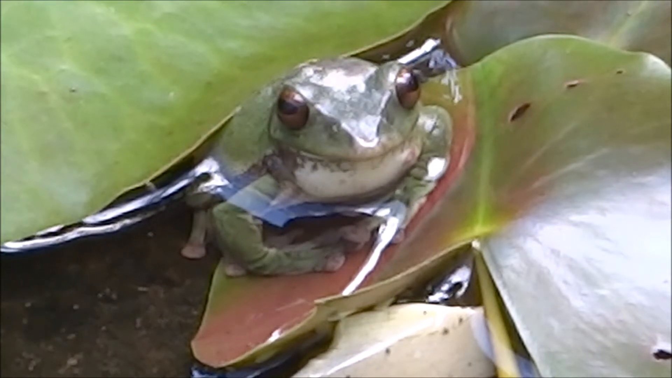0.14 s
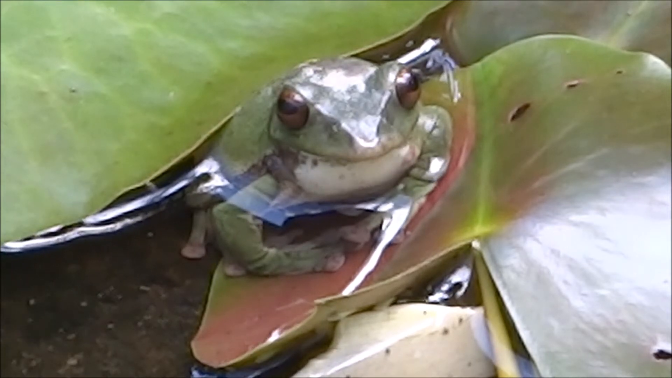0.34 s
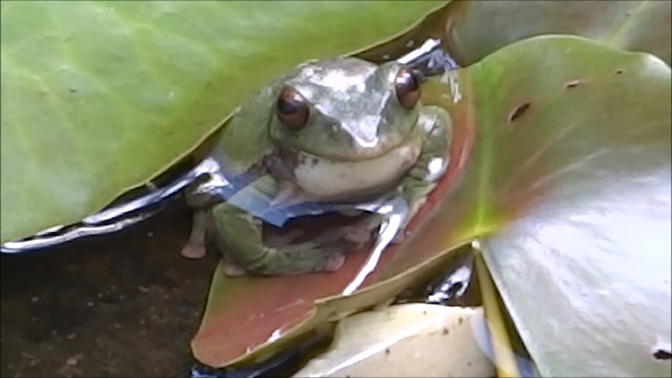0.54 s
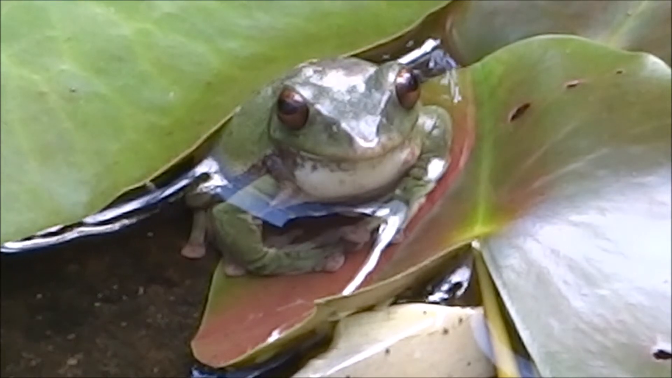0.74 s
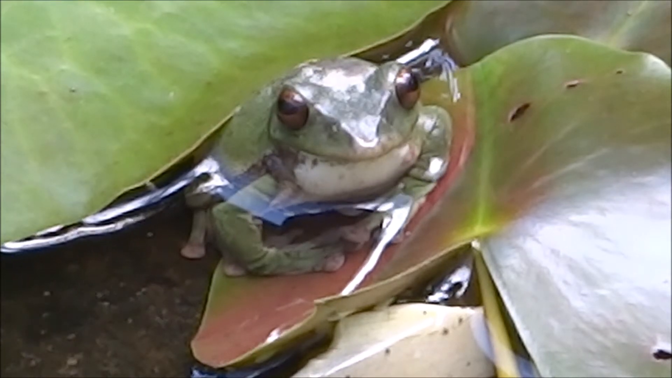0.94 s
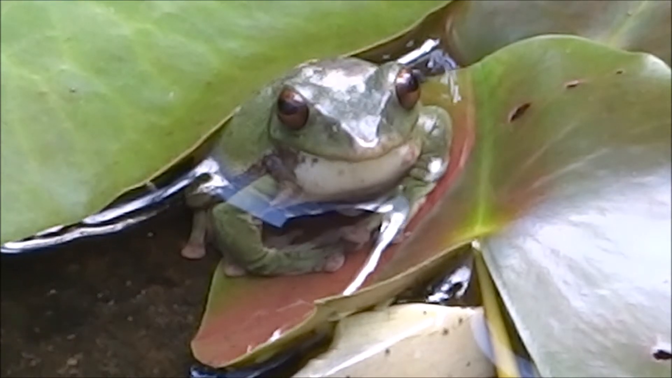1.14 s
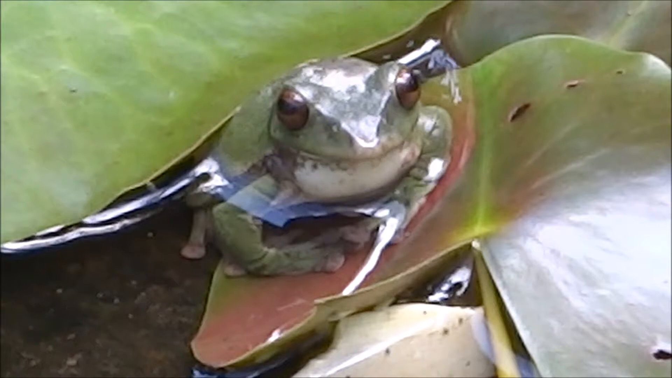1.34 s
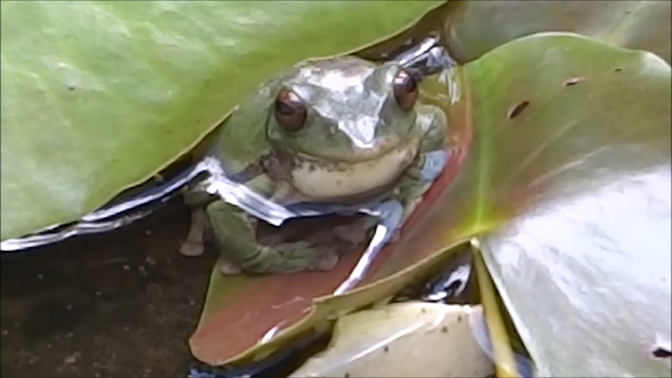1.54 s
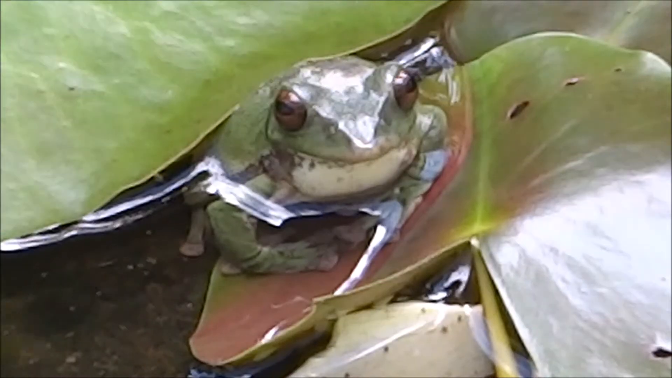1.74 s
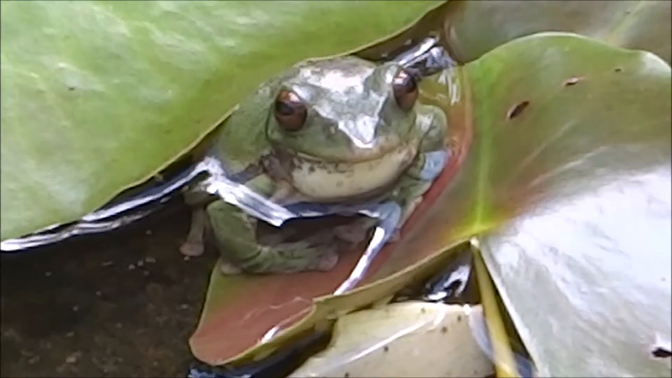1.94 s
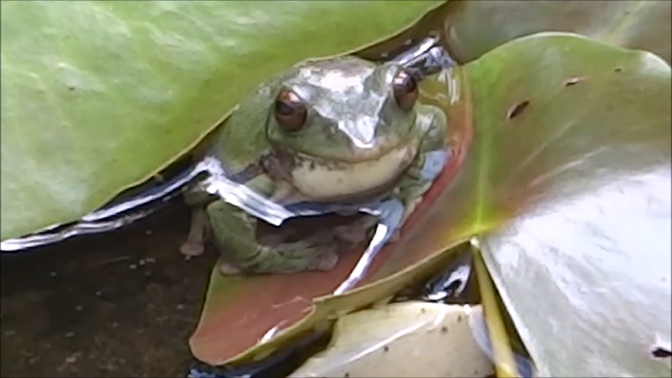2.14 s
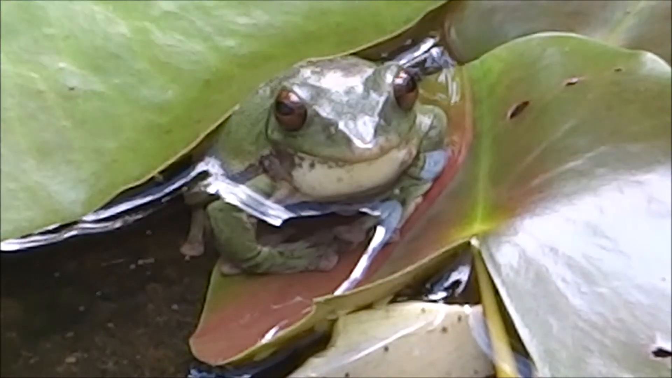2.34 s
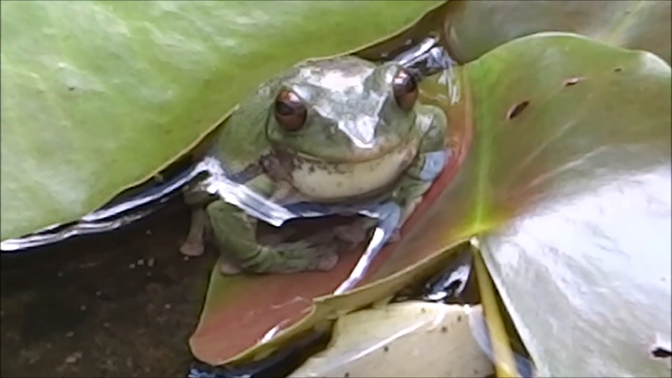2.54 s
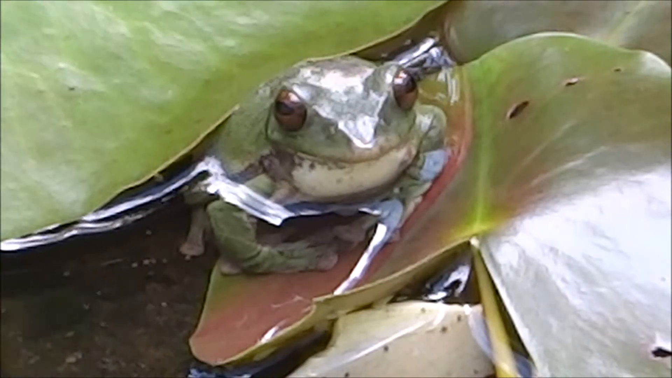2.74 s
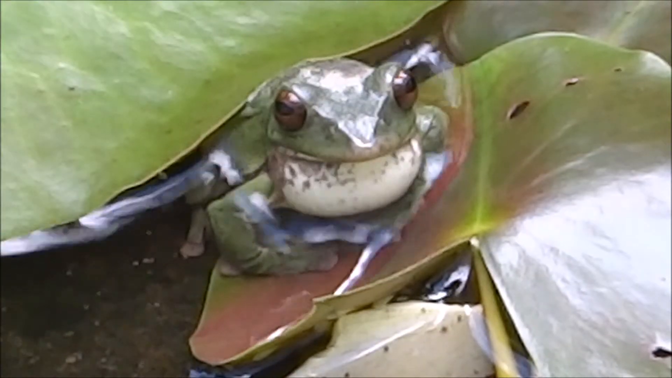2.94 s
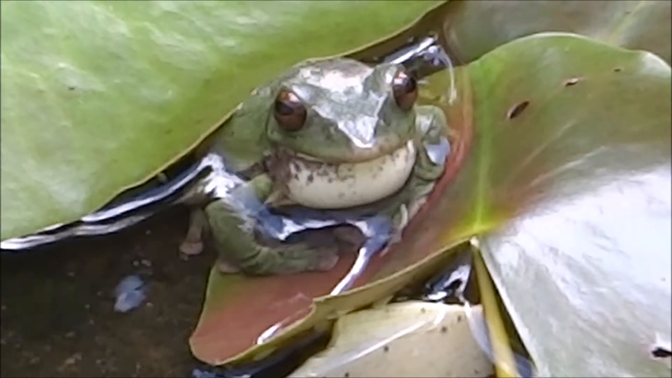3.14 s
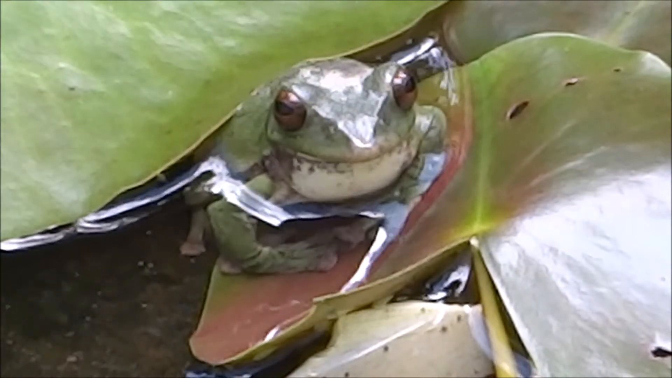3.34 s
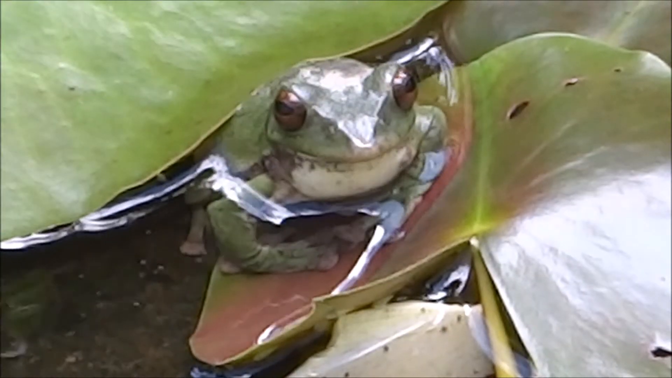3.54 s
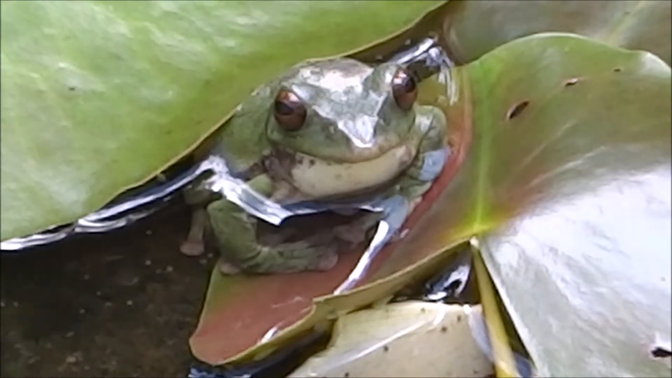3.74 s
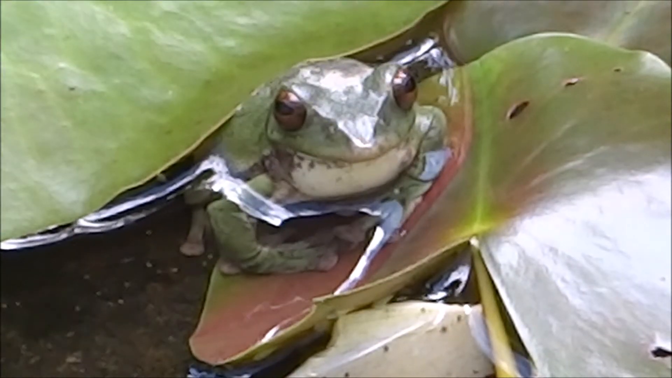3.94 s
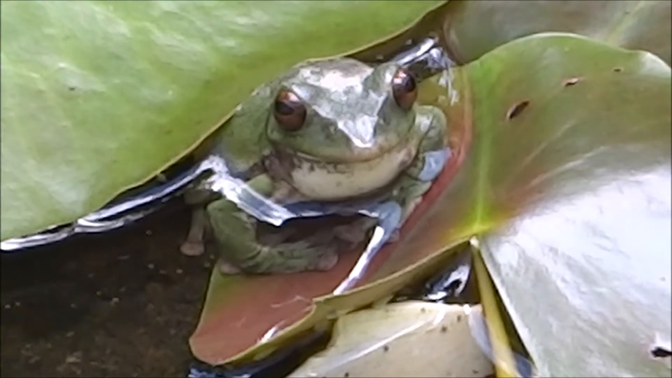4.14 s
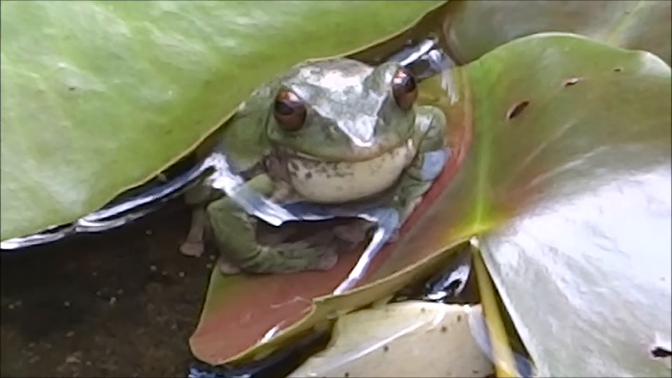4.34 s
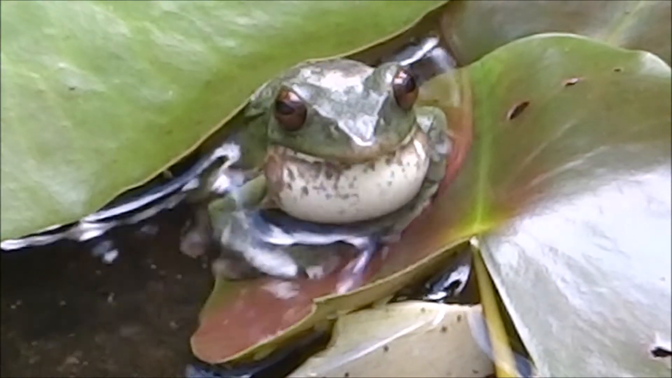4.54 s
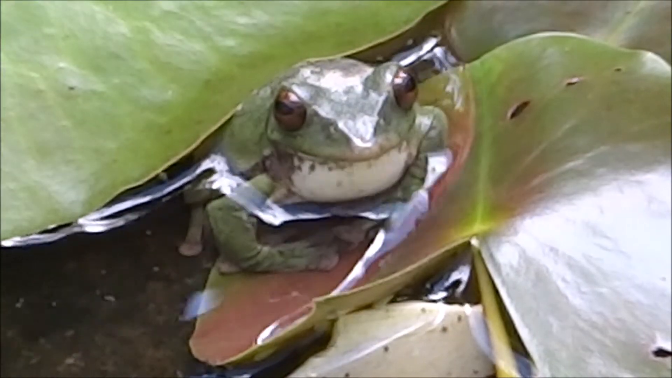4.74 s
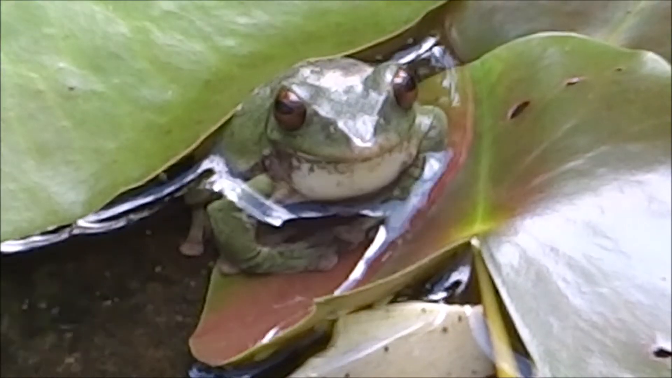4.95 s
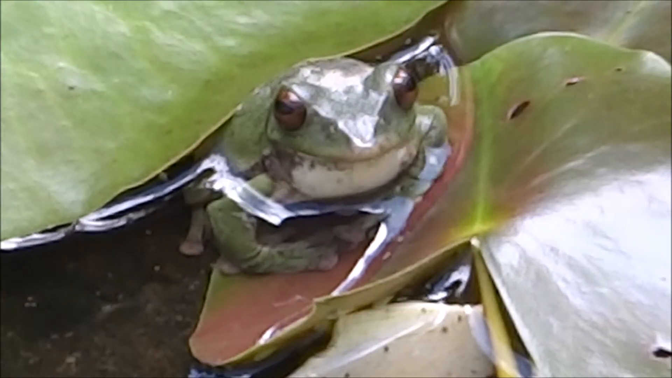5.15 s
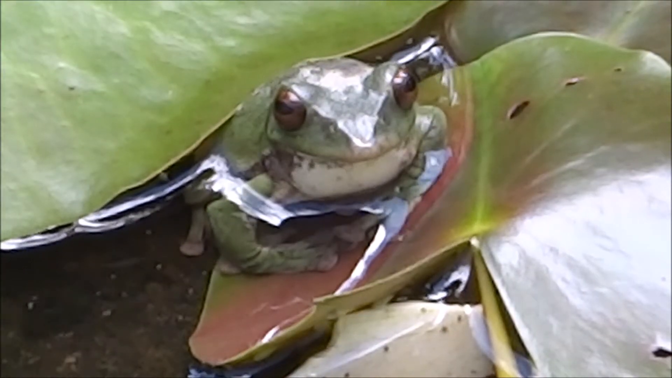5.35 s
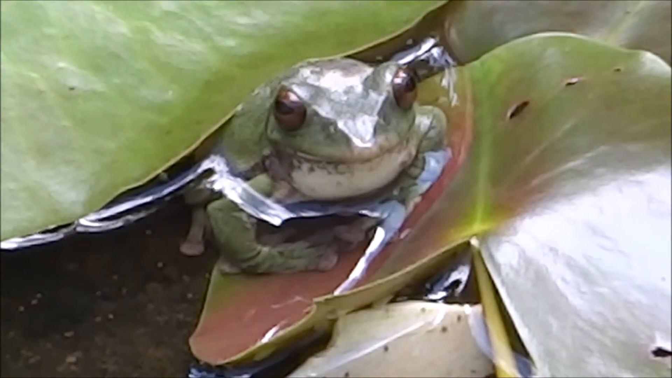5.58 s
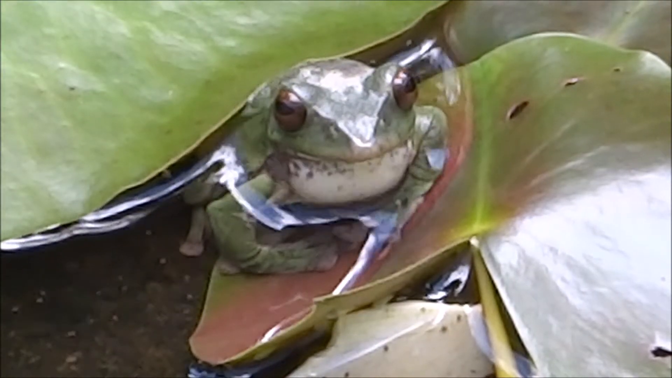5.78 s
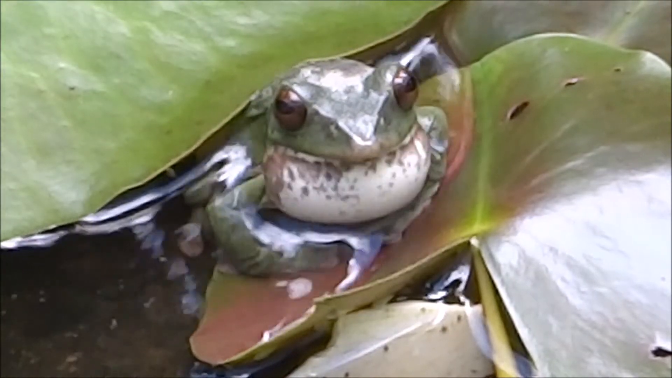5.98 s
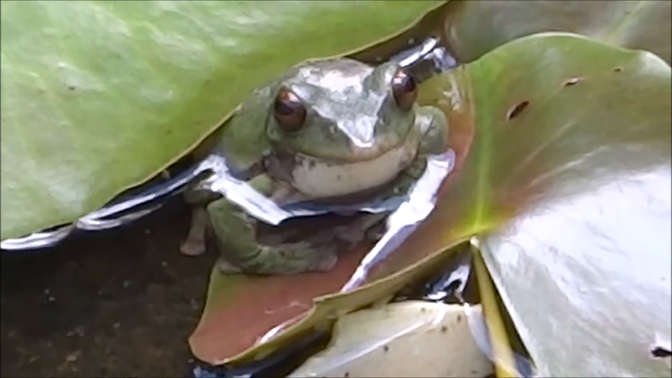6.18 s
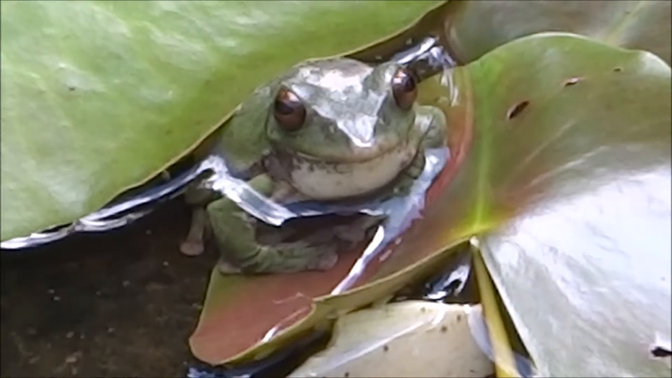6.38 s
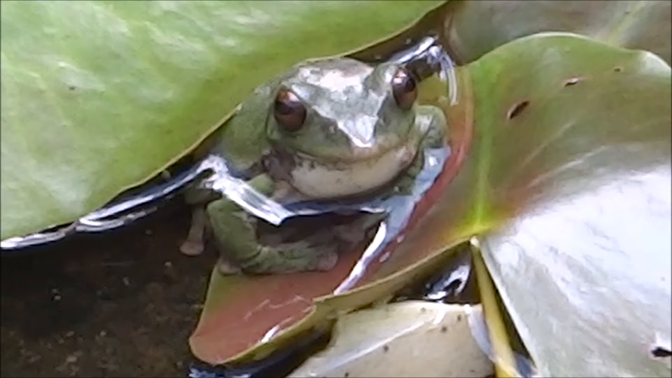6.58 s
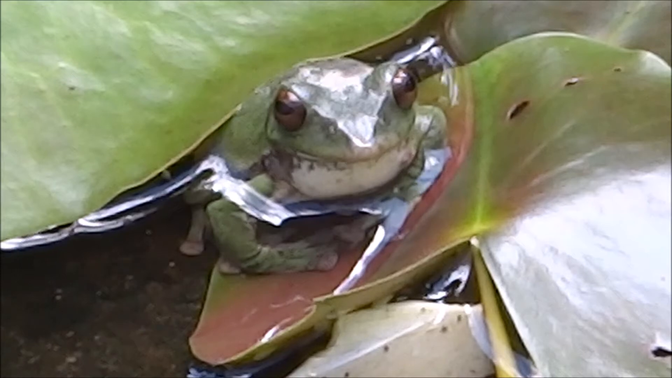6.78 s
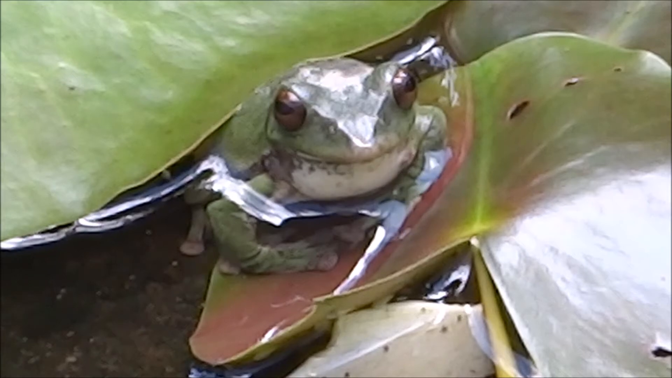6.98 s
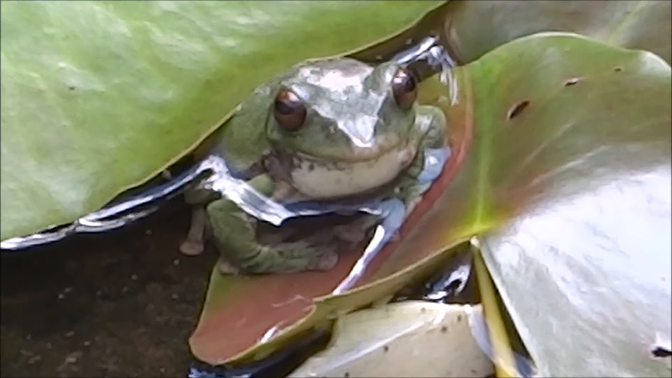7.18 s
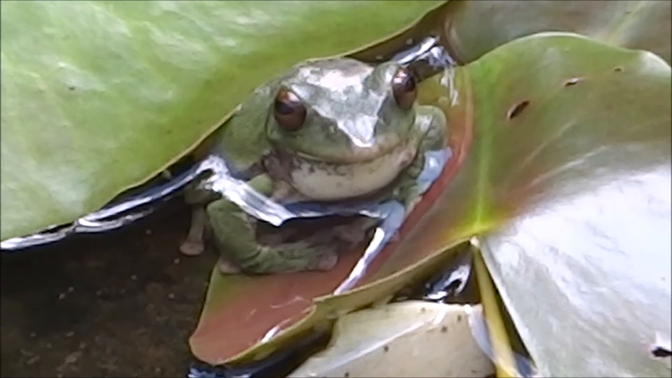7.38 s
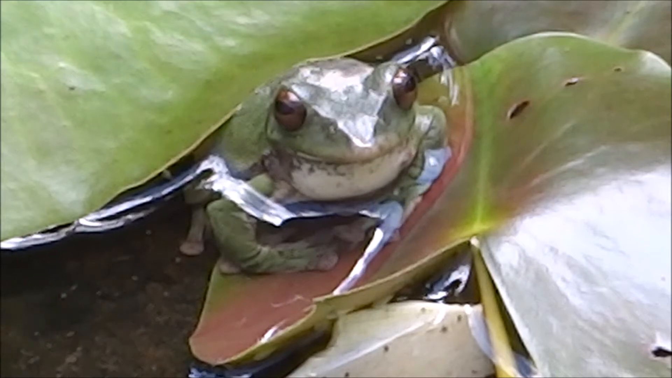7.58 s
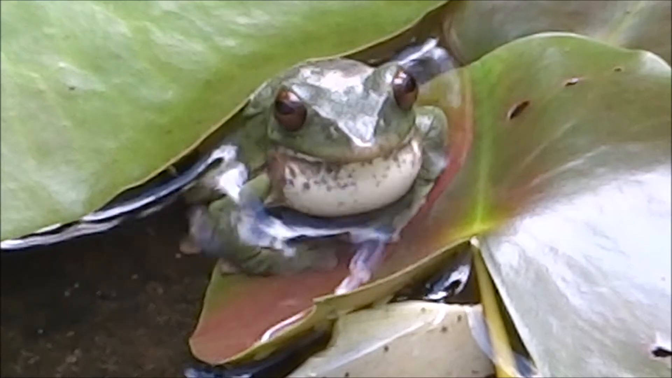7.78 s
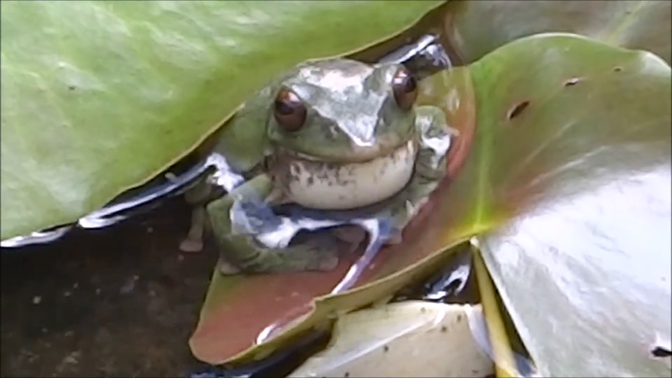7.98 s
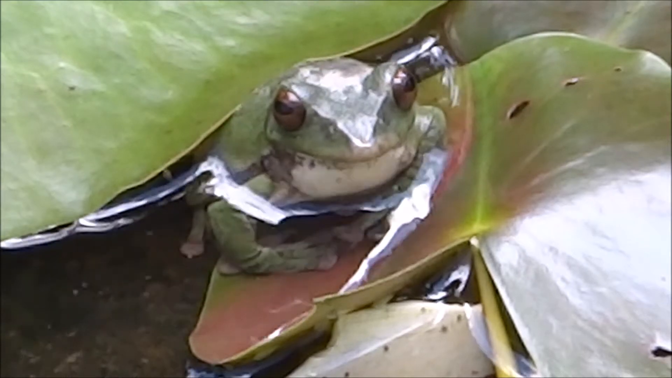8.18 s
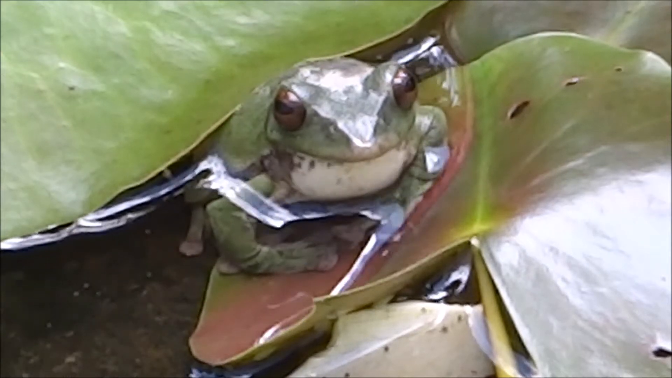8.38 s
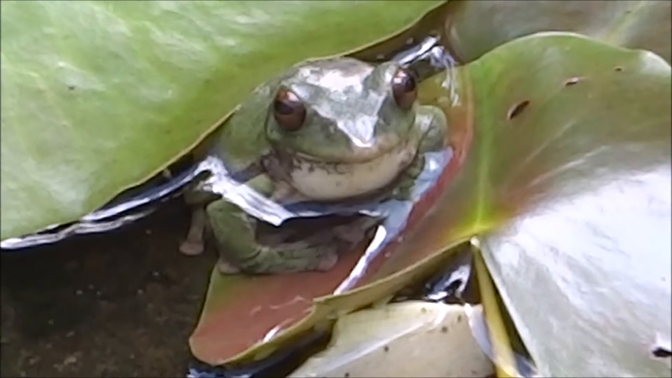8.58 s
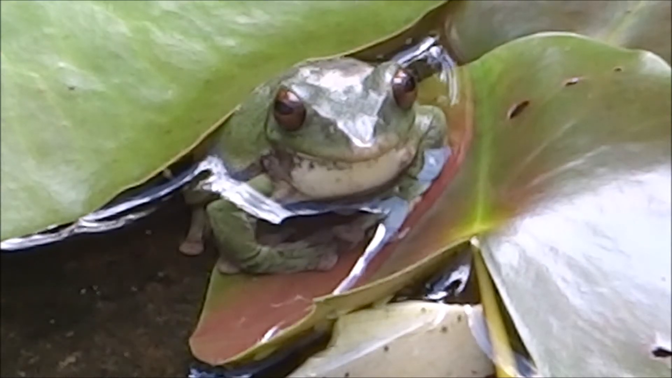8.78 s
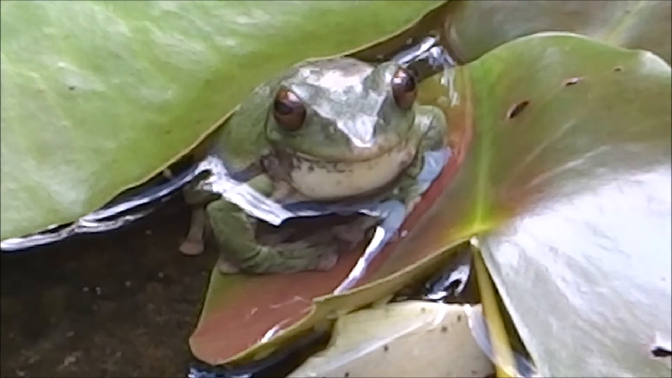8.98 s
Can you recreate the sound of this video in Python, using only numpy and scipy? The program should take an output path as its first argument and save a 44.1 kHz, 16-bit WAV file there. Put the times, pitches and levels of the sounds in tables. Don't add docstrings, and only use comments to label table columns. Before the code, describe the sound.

A garden pond outdoors, heard in stereo from an arm's length. Soft distant traffic hum and fine hiss lie under thin, high songbird chirps, slightly blurred by trees. From about 0.7 to 1.5 s a gust thumps and flutters low on the microphone, strongest near 1.0; at 1.5 s the ambience cuts abruptly to calmer air. Faint chirps continue. At 3.0 s a tree frog snaps out two loud, dry, hollow croaks, about 50 ms apart, with a short garden echo. Bird whistles slide downward from 3.3 to 4.0, with tiny far peeps. Three croaks come at 4.5, four at 5.9, with a small bright water spatter at 6.1. A low wavering whistle follows, ending in a quick tumbling flourish near 7.0. High birdsong repeats throughout. The last, loudest four croaks come at 7.8; the background dips slightly, then recovers, with a faint chirp at 8.6.

```python
import sys
import numpy as np
from scipy import signal
from scipy.fft import rfft, irfft, next_fast_len
from scipy.io import wavfile
from scipy.ndimage import uniform_filter1d

SR = 44100
rng = np.random.default_rng(int(sys.argv[2]) if len(sys.argv) > 2 else 0)


def how_loud(loudness_db):
    steps = np.asarray(loudness_db, float) / 20
    return 10 ** steps


def bounce(signal):
    frames = np.transpose(np.atleast_2d(signal))
    limited = np.clip(frames, -1, 1)
    pcm = np.round(limited * 32767).astype(np.int16)
    wavfile.write(sys.argv[1], SR, pcm)


N = 397782
T = np.arange(N) / SR
CHANGE_S = 1.516


def add(out, x, s, pan_db):
    i = int(round(s * SR))
    x = (x * how_loud(np.array([[pan_db], [-pan_db]]) / 2))[:, max(-i, 0):N - i]
    out[:, max(i, 0):max(i, 0) + x.shape[1]] += x


def butter(x, order, hz, kind="low"):
    return signal.sosfilt(signal.butter(order, hz, kind, fs=SR, output="sos"), x)


def walk(rate):
    k = int(SR / rate)
    w = uniform_filter1d(np.repeat(rng.standard_normal(N // k + 1), k)[:N], k)
    return w / w.std()


def tail(t60_s, db, onset_s, clump_db, top_hz):
    t = T[:int(.7 * SR)]
    noise = rng.standard_normal((3, len(t)))
    ears = butter(noise[0] + 0.42 * noise[1:], 1, top_hz)
    decay_db = -60 * t / t60_s
    ears = ears * how_loud(clump_db * walk(300)[:len(t)] + decay_db) * (1 - np.exp(-t / onset_s))
    return ears * how_loud(db) / np.sqrt(np.mean(np.sum(ears ** 2, axis=1)))


def echo(x, response):
    return signal.fftconvolve(x, response, axes=1)[:, :N]


def tone(rows, flutter_db):
    attack_s, release_s, edge_db = .005, .005, -18
    s, hz, db = np.transpose(rows)
    t = np.arange(s[0], s[-1], 1 / SR)
    knots = np.arange(s[0], s[-1], .006)
    flutter = np.interp(t, knots, rng.standard_normal(len(knots)))
    fade_in = np.clip(1 - (t - s[0]) / attack_s, 0, 1)
    fade_out = np.clip(1 - (s[-1] - t) / release_s, 0, 1)
    level_db = np.interp(t, s, db) + edge_db * (fade_in + fade_out) + flutter_db * flutter
    phase = 2 * np.pi * np.cumsum(np.interp(t, s, hz)) / SR
    return np.sqrt(2) * how_loud(level_db) * np.sin(phase)


# (frequency [Hz], spectral density [dB per Hz])
HUM_SPECTRUM = [(15, -68), (60, -35), (480, -4.5), (950, -2.5), (3500, -10), (5090, -12.5), (11700, -16.5),
                (15800, -20.5)]
# (frequency [Hz], left-right correlation [-1 to 1])
EAR_LIKENESS = [(60, 0.2), (130, 0.24), (290, -0.05), (640, -0.12), (1410, -0.14), (3100, 0.08),
                (6820, 0.48), (15000, 0.76)]
HUM_TRIM_DB, HISS_TRIM_DB, HUM_PAN_DB = -0.5, 1, -1
TRAFFIC_DB, TRAFFIC_AFTER_DB, TRAFFIC_FADE_DB_S = -60, -58, -0.0266
HISS_DB, HISS_AFTER_DB, HISS_FADE_DB_S = -68.5, -69.5, 0.0445
DUCK_S, DUCK_DB, RECOVER_S = 7.95, -2.5, 0.69


def town():
    size = next_fast_len(N)
    hz = np.maximum(np.fft.rfftfreq(size, 1 / SR), 1)
    like_hz, like = np.transpose(EAR_LIKENESS)
    like = np.clip(np.interp(np.log(hz), np.log(like_hz), like), -.9, .95)
    mid, side = rfft(rng.standard_normal((2, size)))
    ears = mid * np.sqrt(1 + like) + side * np.sqrt(1 - like) * np.array([[1], [-1]])
    hum_hz, hum_db = np.transpose(HUM_SPECTRUM)
    ears = ears * how_loud(np.interp(np.log(hz), np.log(hum_hz), hum_db))

    since = T - CHANGE_S
    traffic_db = np.where(since < 0, TRAFFIC_DB, TRAFFIC_AFTER_DB + TRAFFIC_FADE_DB_S * since)
    hiss_db = np.where(since < 0, HISS_DB, HISS_AFTER_DB + HISS_FADE_DB_S * since) + 0.45 * walk(6)
    power = np.abs(ears[0] + ears[1]) ** 2 / (2 * size ** 2)
    low_db = -10 * np.log10(power[(hz > 400) & (hz < 1500)].sum())
    high_db = -10 * np.log10(power[(hz > 8000) & (hz < 15000)].sum())
    duck_db = DUCK_DB * np.exp(-np.abs(T - DUCK_S) / RECOVER_S) * (T > DUCK_S)

    out = 0
    for centre in 2. ** np.arange(4, 15):
        hiss_share = np.clip((np.log2(centre) - 10) / 3, 0, 1)
        band = np.cos(np.pi / 2 * np.clip(np.log2(hz / centre), -1, 1)) ** 2
        db = (1 - hiss_share) * (traffic_db + low_db + HUM_TRIM_DB + 1.53 * walk(3.02))
        db = db + hiss_share * (hiss_db + high_db + HISS_TRIM_DB) + duck_db
        pan = (1 - hiss_share) * HUM_PAN_DB * np.array([[.5], [-.5]])
        out = out + irfft(ears * band, size)[:, :N] * how_loud(db + pan)
    return out


# (frequency [Hz], level [dB])
WHINE_TONES = [(11569, -85), (11628, -85)]


def whine():
    return sum(np.sqrt(2) * how_loud(db) * np.sin(2 * np.pi * f * T) for f, db in WHINE_TONES)


def song(syllables, ratio, bend, swell_db):
    tremor = .008
    out, u = np.zeros((2, SR // 4)), np.linspace(0, 1, num=16)
    for s, length, from_hz, to_hz, db in syllables:
        wobble = 1 + tremor * rng.standard_normal(len(u))
        hz = ratio * wobble * (from_hz + (to_hz - from_hz) * u ** bend)
        rows = np.c_[length * u, hz, db + swell_db * (u - .5)]
        add(out, tone(rows, flutter_db=4.0), s, 0)
    return out[0]


# (time after start [s], length [s], start frequency [Hz], end frequency [Hz], level [dB])
ARCH_SYLLABLES = [
    (0, .054, 5850, 6950, 3),
    (.05, .018, 6880, 6200, -6),
    (.066, .029, 6150, 6900, 0),
]
SCOOP_SYLLABLES = [
    (0, .008, 3900, 3480, -14),
    (0, .069, 3450, 4150, -1),
    (.068, .041, 3450, 4200, -2),
    (.125, .043, 3650, 4200, -11),
]
TICK_SYLLABLES = [
    (.001, 0.018, 4860, 5340, 6.5),
    (.058, .018, 5000, 5550, -6),
]
CLIMB_SYLLABLES = [
    (0, .07, 3950, 5650, 3),
    (.062, .06, 5600, 5650, -11),
]
# (time [s], level [dB], pitch ratio [1])
ARCH_TIMES = [(-.035, -58, 0.99), (0.17, -61.5, 1.01), (.628, -62, .98), (.82, -62, 0.98),
              (1.287, -59.5, .99), (1.492, -60.5, 1.03), (4.165, -66.5, 1.01), (4.364, -66, .99),
              (4.807, -61.5, 1.01), (5.006, -59, 1.02), (5.47, -59, 1.001), (5.66, -55.5, .98),
              (6.114, -54.5, .99), (6.315, -54.5, 0.98), (6.791, -65, 1.001), (6.99, -64.5, 1.02),
              (7.508, -60.5, .97), (7.732, -62.5, .98)]
SCOOP_TIMES = [(0.399, -53.5, 1.007), (1.053, -52.5, .99), (4.586, -52.5, 1.03), (5.23, -53, 1.024),
               (5.889, -56.5, 0.98), (6.546, -49.5, 1.01), (7.225, -49, 1.03), (7.982, -51.5, 1.004)]
CLIMB_TIMES = [(0.26, -61, 1.02), (.72, -65, 1.01), (1.185, -62, .99), (2.32, -70, 1.06),
               (2.77, -64, 1.001), (3.235, -62, 1.02), (3.705, -63.5, 1.01), (4.201, -72, 1.01),
               (5.611, -67.5, .92), (8.635, -64, .96)]
# (bend [under 1 starts fast, over 1 ends fast], swell over a syllable [dB], direct sound [dB])
ARCH_MANNER, SCOOP_MANNER = (.42, -4, -3.5), (2.4, 5, 1.5)
TICK_MANNER, CLIMB_MANNER = (.8, -4, 1.5), (1.05, 1, -8)
TICK_LEAD_S, TICK_DB = .03, -16.5
SONG_PAN_DB = 1


def songbirds(trees):
    before, after = np.zeros((2, 2, N))
    tick_times = np.add(SCOOP_TIMES, (-TICK_LEAD_S, TICK_DB, 0))
    songs = ((ARCH_SYLLABLES, ARCH_MANNER, ARCH_TIMES), (SCOOP_SYLLABLES, SCOOP_MANNER, SCOOP_TIMES),
             (TICK_SYLLABLES, TICK_MANNER, tick_times), (CLIMB_SYLLABLES, CLIMB_MANNER, CLIMB_TIMES))
    for syllables, (bend, swell_db, direct_db), times in songs:
        for s, db, ratio in times:
            note = how_loud(db) * song(syllables, ratio, bend, swell_db)
            heard = signal.fftconvolve(note[None], trees, axes=1)
            add(heard, how_loud(direct_db) * note, 0, 0)
            add(before if s < CHANGE_S else after, heard, s, SONG_PAN_DB)
    return before * (T < CHANGE_S) + after


# (time [s], peak level [dB], frequency [Hz])
WIND_PUFFS = [(0.459, -66, 334), (0.549, -67, 318), (0.684, -58, 131.6), (0.767, -47, 132),
              (0.789, -41.5, 184), (0.822, -49, 132), (0.874, -39, 263), (0.91, -49, 218),
              (0.939, -59, 165), (0.978, -41, 132), (0.989, -47, 132), (0.997, -29.5, 288),
              (1.014, -37, 190), (1.023, -37, 273), (1.04, -31, 248), (1.046, -37, 132), (1.084, -53, 315),
              (1.149, -67, 132), (1.204, -57, 132), (1.234, -50, 135), (1.259, -53, 334), (1.289, -60, 191),
              (1.323, -54, 150), (1.389, -60, 350), (1.453, -53, 176), (1.496, -50, 168)]


def wind_slaps():
    length_cycles, shift_rad = .52, 1.1
    out = np.zeros((2, N))
    for (s, db, hz), (turn, skew) in zip(WIND_PUFFS, rng.uniform(-0.55, 1, (len(WIND_PUFFS), 2))):
        cycles = np.arange(-3 * SR / hz, 3 * SR / hz) * hz / SR
        apart = (1.08 + 0.28 * skew) * hz / 200 * np.array([[-.5], [.5]])
        phase = 2 * np.pi * cycles + np.pi * turn + shift_rad * apart
        envelope = np.exp(-((cycles + 0.096 * apart) / length_cycles) ** 2)
        add(out, how_loud(db + 4.0) * envelope * np.cos(phase), s - 3 / hz, 0)
    return out


def wind_rumble():
    rumble_db, slope, swell_s, calm_db = -26.5, 0.66, 0.015, -86
    noise = rng.standard_normal((3, N))
    rumble = butter(noise[0] + .5 * noise[1:], 2, (45, 150), "band")
    swell = how_loud(calm_db)
    for s, db, hz in WIND_PUFFS:
        swell = swell + how_loud(slope * db + rumble_db) * np.exp(-np.abs(T - s) / swell_s)
    return rumble / rumble.std() * swell * how_loud(2.6 * walk(40)) * (T < CHANGE_S)


# (time [s], peak level [dB], sac resonance [Hz], mouth resonance [Hz], overtone boost [dB])
CROAK_CALLS = [(3.005, -13, 874, 2810, 0), (3.058, -15, 796, 3160, 1), (4.494, -14, 876, 3030, 4.5),
               (4.537, -10.5, 1024, 3420, 3.5), (4.586, -9.5, 1020, 3460, 5), (5.859, -14.5, 923, 3090, 3),
               (5.904, -11, 1073, 3520, 3), (5.952, -9.5, 1102, 3590, 1), (6.009, -11, 1020, 3410, 7),
               (7.785, -16, 904, 2870, 3), (7.825, -11, 1134, 3510, 4), (7.875, -9.5, 1170, 3600, 1),
               (7.928, -9, 1170, 3600, 1.5)]
LARYNX_SLIPS = [
    (3.0096, -19.5, 1330, 2880, 12),
    (3.062, -20, 1300, 2600, 8),
    (4.4993, -24, 970, 3300, 3),
    (2.83, -40, 900, 2700, -3),
]
# (multiple of mouth resonance [1], level [dB], decay [ms])
MOUTH_OVERTONES = [(.51, -14, 3.1), (0.7, -21, 3.1), (.86, -23, 2.1), (1.35, -38, 7.2), (1.6, -38.5, 3),
                   (2.8, -39, 1.3)]
SAC_DECAY_MS, MOUTH_DECAY_MS, THROAT_DECAY_MS = 9.2, 2.76, 4.0
MOUTH_DB, FRESH_DB, FRESH_S = -15, 2, 0.21
THROAT_HZ, THROAT_DB = 1345, -17
SLACK = 0.45
RASP_DB, RASP_DECAY_MS, RASP_HZ = -26.5, 2.74, 1800
SAG = 0.0094
RISE_MS, LEAD_MS = .22, 1.75
FULL_DB, OPEN_MS, OPEN_MS_PER_DB, SHUT_MS = -8.5, 5.84, 0.34, 0.79
FROG_PAN_DB = -0.8


def frog_croaks():
    out, ms = np.zeros((2, N)), 1000 * T[:600]
    calls = list(CROAK_CALLS) + LARYNX_SLIPS
    chance = rng.standard_normal((len(calls), 2, len(MOUTH_OVERTONES)))
    air = butter(rng.standard_normal((len(calls), len(ms))), 1, RASP_HZ)
    clock = 2 * np.pi * ms * (1 - SAG * (ms - 2.5)) / 1000
    for (s, db, sac_hz, mouth_hz, boost_db), (detune, spread), hiss in zip(calls, chance, air):
        burst_s = min(c[0] for c in calls if c[0] > s - .3)
        mouth_db = MOUTH_DB + FRESH_DB * np.exp(-((s - burst_s) / FRESH_S) ** 2)
        throat_db = THROAT_DB - SLACK * (db - FULL_DB)
        modes = [(sac_hz, 0, SAC_DECAY_MS), (mouth_hz, mouth_db, MOUTH_DECAY_MS),
                 (THROAT_HZ, throat_db, THROAT_DECAY_MS)]
        for (ratio, d, decay_ms), a, b in zip(MOUTH_OVERTONES, detune, spread):
            modes.append((mouth_hz * ratio * (1 + 0.018 * a), d + boost_db + 2.9 * b, decay_ms))
        ring = sum(how_loud(d) * np.exp(-ms / decay_ms) * np.sin(f * clock) for f, d, decay_ms in modes)
        rasp = how_loud(RASP_DB) * np.exp(-ms / RASP_DECAY_MS) * hiss / hiss.std()
        open_ms = OPEN_MS + OPEN_MS_PER_DB * (db - FULL_DB)
        opening = 1 / (1 + np.exp((LEAD_MS - ms) / RISE_MS))
        closing = 1 / (1 + np.exp((ms - open_ms) / SHUT_MS))
        add(out, (ring + rasp) * opening * closing * how_loud(db + 6.0), s - LEAD_MS / 1000, FROG_PAN_DB)
    return signal.sosfilt(signal.cheby2(4, 28, 460, "high", fs=SR, output="sos"), out)


# (delay [ms], level [dB], left minus right [dB])
GARDEN_ECHOES = [(4.773, -16, -2.5), (7.32, -24, -1), (10.74, -21, 3), (19.8, -26, 1.5), (33.8, -21, -4),
                 (53, -22.5, 4)]


def garden(croaks):
    response = tail(t60_s=.32, db=-16, onset_s=0.0067, clump_db=-1.0, top_hz=2520)
    ms = 1000 * T[:400]
    roughness = rng.standard_normal((len(GARDEN_ECHOES), len(ms)))
    for (delay_ms, db, pan_db), facets in zip(GARDEN_ECHOES, roughness):
        smear = uniform_filter1d(facets, size=4) * np.exp(-ms / (.11 * delay_ms))
        smear[:4] += 0.63 * np.abs(smear).max()
        add(response, how_loud(db) * smear / np.linalg.norm(smear), delay_ms / 1000, pan_db)
    return echo(croaks, butter(response, 1, 1800, "high"))


def through_trees(out, phrase, trees, wet_db):
    note = tone(phrase, flutter_db=2.8)
    heard = how_loud(wet_db) * signal.fftconvolve(note[None], trees, axes=1)
    add(heard, note, 0, -3.5)
    add(out, heard, phrase[0][0], 0)


# (time [s], frequency [Hz], level [dB])
WHISTLE_PHRASES = [
    [(2.96, 3000, -68), (3.02, 3100, -51.5), (3.074, 3126, -52.5), (3.13, 3180, -67), (3.24, 3150, -73)],
    [(3.29, 2620, -64), (3.33, 2704, -54.5), (3.41, 2417, -60), (3.46, 2390, -61), (3.52, 2370, -63.5),
     (3.62, 2380, -76)],
    [(3.73, 3680, -62), (3.8, 3450, -61), (3.888, 2665, -62), (3.97, 2700, -60.5), (4.04, 2770, -71)],
    [(6.14, 1844, -65), (6.22, 1865, -67), (6.36, 1870, -53), (6.456, 1860, -57.5), (6.562, 1870, -47),
     (6.69, 1850, -60)],
]
# (time [s], frequency [Hz], level [dB])
FLOURISH_PHRASES = [
    [(6.697, 1960, -42), (6.71, 2100, -56), (6.73, 1940, -54), (6.778, 1474, -62)],
    [(6.805, 1890, -62), (6.832, 1963, -48), (6.846, 2720, -49), (6.856, 3080, -52), (6.866, 2800, -65)],
    [(6.936, 3980, -56), (6.944, 3820, -44), (6.955, 4356, -57), (6.972, 2997, -46.5), (6.99, 2350, -50),
     (7.04, 2150, -58), (7.08, 1943, -53.5), (7.118, 1414, -59)],
]


def whistler(trees):
    out = np.zeros((2, N))
    for phrases, wet_db in ((WHISTLE_PHRASES, -5), (FLOURISH_PHRASES, 5.0)):
        for phrase in phrases:
            through_trees(out, phrase, trees, wet_db)
    return out


# (time [s], level [dB], frequency [Hz])
FAR_PEEPS = [
    (3.51, -67, 4510),
    (3.585, -69, 4540),
    (3.8, -63, 5070),
    (3.9, -72, 5150),
]


def far_bird(trees):
    out, length_s = np.zeros((2, N)), 0.032
    for s, db, hz in FAR_PEEPS:
        through_trees(out, [(s, hz, db), (s + length_s, hz, db)], trees, -5)
    return out


def drip():
    time_s, level_db, decay_s = 6.102, -50.5, .016
    out = np.zeros((2, N))
    t = T[:int(3 * decay_s * SR)]
    spatter = rng.standard_normal(len(t)) * how_loud(3.0 * walk(300)[:len(t)]) * np.exp(-t / decay_s)
    add(out, how_loud(level_db) * butter(spatter, 1, (2500, 11000), "band"), time_s, 0)
    return out


def scene():
    trees = tail(t60_s=.42, db=-3.5, onset_s=.006, clump_db=1.5, top_hz=12000)
    background = town() + whine()
    birds = songbirds(trees) + whistler(trees) + far_bird(trees)
    wind = wind_slaps() + wind_rumble()
    croaks = frog_croaks()
    return background + birds + wind + croaks + garden(croaks) + drip()


def roll_off(x):
    return signal.sosfilt(signal.butter(12, 15800, fs=SR, output="sos"), x)


def record(dry):
    bent = dry + .008 * dry ** 2
    x = butter(bent, 2, 38, "high")
    x = signal.sosfilt(signal.ellip(8, .3, 60, 15750, fs=SR, output="sos"), x)
    return roll_off(x)


dry = scene()
out = record(dry)
bounce(out)
```